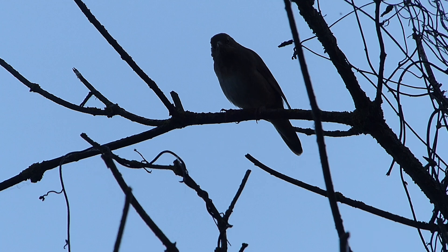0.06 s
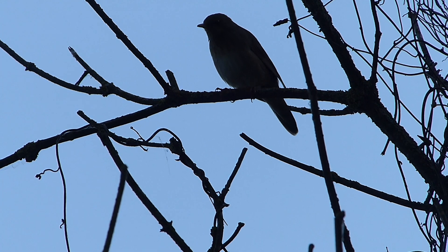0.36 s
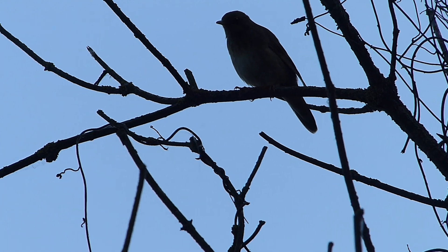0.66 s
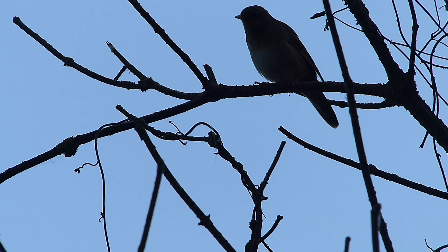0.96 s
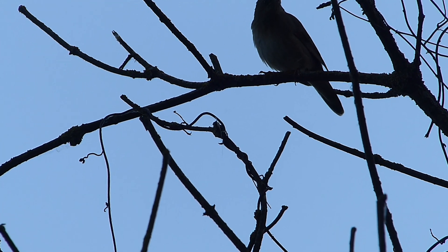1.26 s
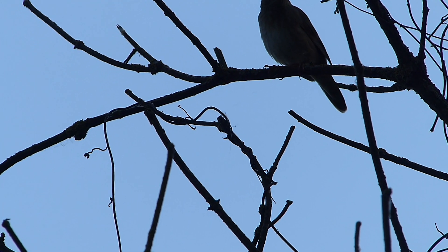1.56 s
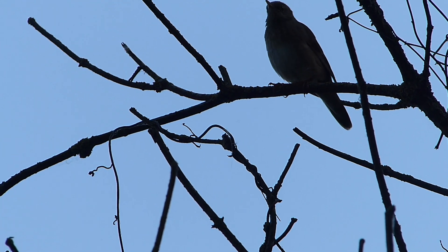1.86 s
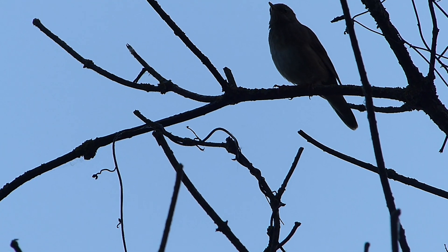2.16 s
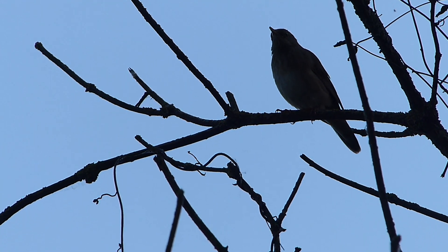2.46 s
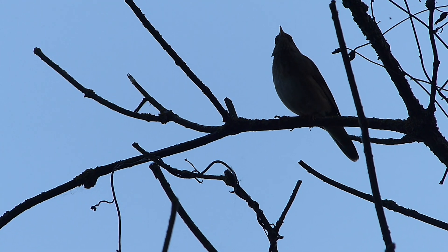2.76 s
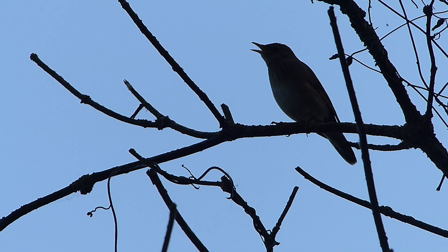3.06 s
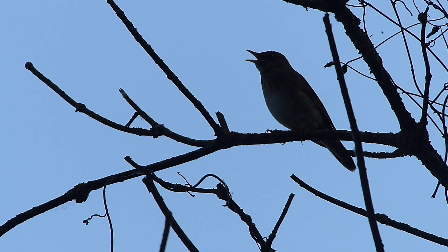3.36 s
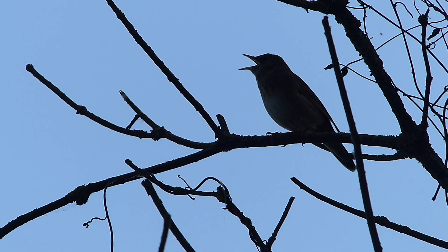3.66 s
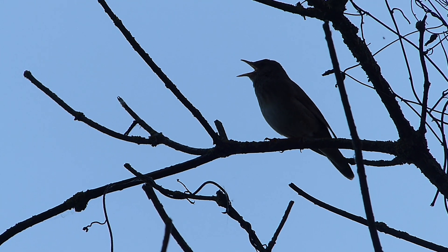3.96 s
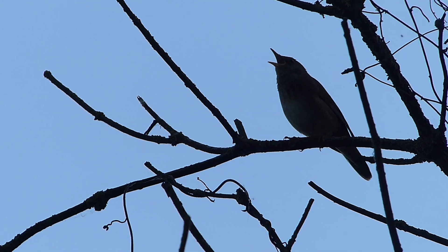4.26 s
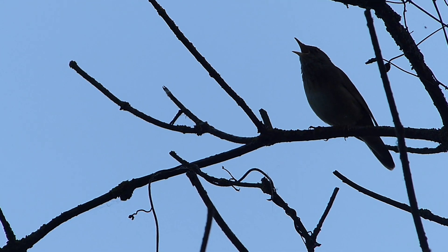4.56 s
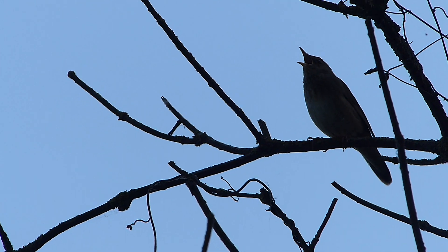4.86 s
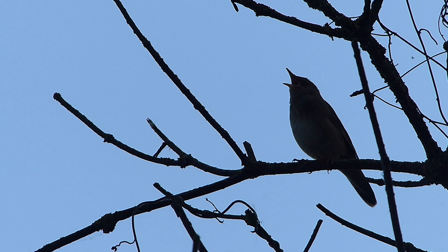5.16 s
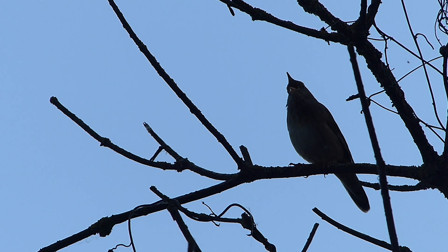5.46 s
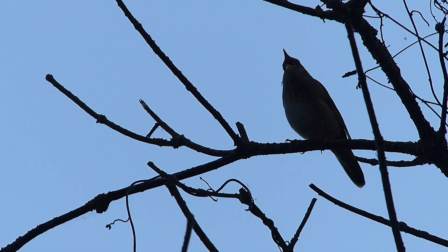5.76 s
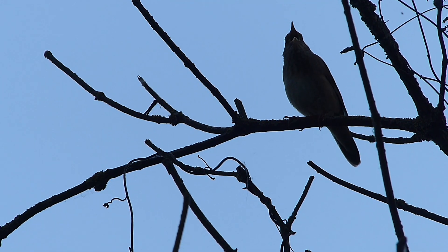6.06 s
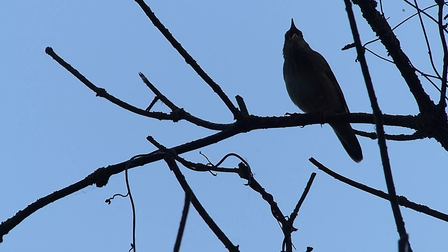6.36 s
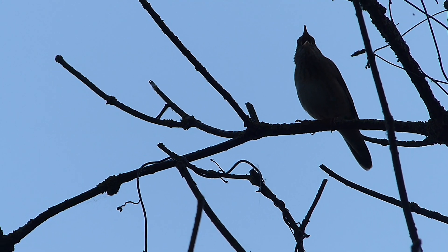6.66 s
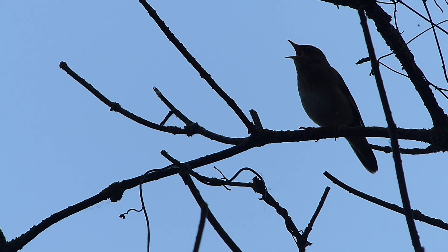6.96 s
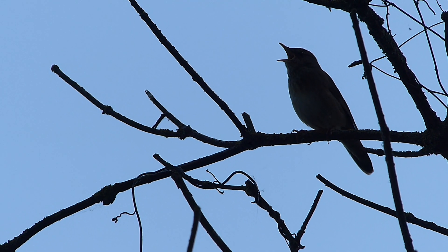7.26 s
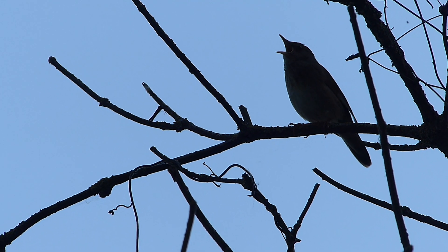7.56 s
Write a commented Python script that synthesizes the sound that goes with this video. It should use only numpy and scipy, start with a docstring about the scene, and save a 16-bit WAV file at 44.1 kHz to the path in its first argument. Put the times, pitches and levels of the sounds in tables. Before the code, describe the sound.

In a thicket, soft air hiss and low gusts rumble on the microphone while a distant bird gives three short runs of dry ticking chatter. A nearby warbler then starts with a few soft, halting notes and swells into a high, fast, buzzing trill like a sewing machine. It keeps going evenly with a light woodland echo, and the sound narrows from wide stereo to near mono as the trill begins.

```python
"""In a thicket, a river warbler warms up and swells into its sewing-machine trill, 16 syllables a second. Each
syllable is a rattle of fast down-sweeps from the syrinx, ending in a whistle; four kinds take turns, and the
wood echoes them. The air hisses over a faint hum, gusts rumble on the microphone, and another bird chatters
before the song. The stereo image closes to near mono as the trill begins."""
import sys
import numpy as np
from scipy import signal
from scipy.fft import rfft, irfft, next_fast_len
from scipy.io import wavfile
from scipy.ndimage import map_coordinates

SR = 44100
rng = np.random.default_rng(int(sys.argv[2]) if len(sys.argv) > 2 else 0)


def dump(signal):
    """Clip the signal to [-1, 1] and save it as 16-bit WAV at the path in sys.argv[1]."""
    limited = np.clip(np.atleast_2d(signal).T, -1, 1)
    pcm = np.round(limited * 32767).astype(np.int16)
    wavfile.write(sys.argv[1], SR, pcm)


N = 335601


def amp(db):
    """Decibels to gain."""
    return 10 ** (np.asarray(db) / 20)


def unit_rms(x):
    """Scale to rms 1."""
    return x / np.sqrt(np.mean(x ** 2) + 1e-20)


def at_freq(rows, hz):
    """Rows of freq_hz, value, read on a log axis."""
    freq_hz, value = np.transpose(rows)
    return np.interp(np.log(hz + 1), np.log(freq_hz + 1), value)


def curve(rows):
    """Rows of time_s, value, read at every sample."""
    return np.interp(np.arange(N) / SR, *np.transpose(rows))


def wobble(rate_hz):
    """Smooth random curve, rate_hz knots a second."""
    knots = rng.standard_normal(int(N * rate_hz / SR) + 4)
    return map_coordinates(knots, [np.arange(N) * rate_hz / SR])


def filtered(x, response):
    """Zero-phase filter with gain response(hz)."""
    size = next_fast_len(N + 8192)
    return irfft(rfft(x, size) * response(np.fft.rfftfreq(size, 1 / SR)), size)[..., :N]


def noise(spectrum):
    """Coloured noise, rms 1."""
    return unit_rms(filtered(rng.standard_normal(N), lambda hz: amp(at_freq(spectrum, hz))))


def band(centre_hz, width_hz):
    """Bell-shaped noise band, rms 1."""
    white = rng.standard_normal(N)
    return unit_rms(filtered(white, lambda hz: np.exp(-((hz - centre_hz) / width_hz) ** 2)))


def add(track, start_s, sound):
    """Mix a sound into the track."""
    span = track[round(start_s * SR):][:len(sound)]
    span += sound[:len(span)]


# Spectra of mid murmur, mid hiss and side air: freq_hz, level_db
MURMUR_SPECTRUM = [(20, -23), (100, -13.5), (250, -10), (450, -3.5), (620, 1), (850, -0.5), (1000, .5),
                   (1200, -3.5), (1700, -6.5), (2400, -11), (4000, -13), (12000, -39)]
HISS_SPECTRUM = [(1500, -25), (3000, -11), (4150, 0), (4450, -2), (4850, 2.5), (7000, 0), (9500, -1),
                 (11500, -7.5), (14000, -19.5), (16000, -28)]
AIR_SIDE_SPECTRUM = [(20, -24), (60, -22), (130, -21), (300, -7), (550, 2), (900, -2), (1300, -8.5),
                     (2400, -16.5), (5000, -12.5), (9500, -10.5), (12000, -18), (16000, -38)]
# Envelopes of murmur, hiss and the hum near 440 Hz: time_s, level_db
MURMUR_LEVEL = [(0.3, -51), (0.89, -50), (1.05, -50.5), (1.21, -52), (7.6, -52.5)]
HISS_LEVEL = [(.25, -45.5), (1.2, -45.5), (2.3, -47), (3.5, -46), (7.6, -43.5)]
HUM_LEVEL = [(.25, -59.5), (1.4, -64), (2.1, -63), (2.6, -55), (3.1, -66), (7.6, -77)]
# Steady side-channel hum: centre_hz, width_hz, level_db
SIDE_HUM = [(440, 38, -59), (662, 34, -49)]


def background(murmur_db, hiss_db, side_db):
    """Murmur of the landscape, fine hiss and a faint recorder hum; returns mid, side."""
    murmur = amp(murmur_db + curve(MURMUR_LEVEL) + 0.75 * wobble(7.2)) * noise(MURMUR_SPECTRUM)
    hiss = amp(hiss_db + curve(HISS_LEVEL)) * noise(HISS_SPECTRUM)
    hum = amp(curve(HUM_LEVEL)) * band(centre_hz=441, width_hz=38)
    side_hum = sum(amp(db) * band(hz, width_hz) for hz, width_hz, db in SIDE_HUM)
    return murmur + hiss + hum, amp(side_db) * noise(AIR_SIDE_SPECTRUM) + side_hum


# Gusts: peak_s, level_db, rise_s, fall_s, bass_db
GUSTS = [(.38, -50.5, 0.1, .1, 5), (1.05, -36, .18, 0.15, 2), (1.71, -42.5, .11, .1, 6.5),
         (1.97, -45, 0.11, 0.093, 5.5), (3.47, -45, 0.34, 0.34, 8), (3.63, -42, .05, 0.044, 7),
         (4.16, -43, .18, 0.15, -1.5), (4.9, -54.5, 0.72, 0.47, 0.5), (5.25, -54, 0.18, 0.23, 0),
         (5.348, -40.5, 0.018, .02, -3), (7.5, -55, 0.27, .3, 1.5)]


def gusts(calm_db):
    """Bell-shaped gusts over a breeze, 10 dB down at rise_s and fall_s; returns strength, bass_db."""
    t = np.arange(N) / SR
    power, weighted_bass = amp(calm_db) ** 2, 0
    for peak_s, level_db, rise_s, fall_s, bass_db in GUSTS:
        from_peak = (t - peak_s) / np.where(t < peak_s, rise_s, fall_s)
        gust_power = amp(level_db - 10 * np.minimum(from_peak ** 2, 20)) ** 2
        power += gust_power
        weighted_bass += bass_db * gust_power
    return np.sqrt(power), weighted_bass / power


# Buffeting spectra, common and opposed: freq_hz, level_db
RUMBLE_MID = [(20, -36), (52, -33), (85, -10), (130, -2), (210, -0.5), (300, -6.5), (430, -13),
              (600, -18.5), (1000, -36), (2000, -55), (4000, -90)]
RUMBLE_SIDE = [(20, -40), (50, -27), (97, -7.5), (213, 1.5), (450, -9), (600, -18), (800, -28), (1570, -48),
               (4000, -67)]


def wind(mid_db, side_db, flutter_db):
    """Gusts push the microphone ports mostly in opposition, more in common in the bass: mid, side."""
    swell, bass_db = gusts(calm_db=-79)
    strength = swell * amp(flutter_db * wobble(28))
    flow = noise(RUMBLE_MID)
    bass = filtered(flow, lambda hz: at_freq([(130, 1), (240, 0.21)], hz))
    tilt = amp(bass_db / 2)  # deep gusts trade upper rumble for bass
    common = bass * tilt + (flow - bass) / tilt
    return strength * amp(mid_db) * common, strength * amp(side_db) * noise(RUMBLE_SIDE)


# Scolding runs: start_s, note_count, first_gap_s, gap_growth_s, level_db
CHATTER_RUNS = [(.7896, 5, 0.038, 0.0043, -37.5), (1.827, 9, .039, .002, -37.5),
                (2.277, 5, .047, .0056, -38.5)]


def chatter(gain_db, first_note_db, rise_s, tick_gap_s, scatter_db):
    """Another bird's noisy double ticks, in runs that start softly and slow down."""
    envelope = np.zeros(N)
    t = np.arange(SR // 20) / SR
    tick = t / rise_s * np.exp(1 - t / rise_s)
    for start_s, note_count, first_gap_s, gap_growth_s, level_db in CHATTER_RUNS:
        for k in range(round(note_count)):
            note_s = start_s + k * first_gap_s + gap_growth_s * k * (k - 1) / 2
            note_db = gain_db + level_db + first_note_db * (k == 0)
            for onset_s in (note_s, note_s + tick_gap_s):
                add(envelope, onset_s, amp(note_db + scatter_db * rng.standard_normal()) * tick)
    return envelope * band(centre_hz=3370, width_hz=980)


# Echo decay: freq_hz, t60_s
THICKET_DECAY = [(2500, 0.69), (6000, 0.46), (14000, 0.21)]


def thicket(x, blocks=16):
    """Diffuse echo of the wood; swaying leaves renew the tail each block, and the echo carries little of the
    highest overtones."""
    freq_hz, t, spectra = signal.stft(rng.standard_normal((blocks, SR // 2)), SR, nperseg=256)
    decay = amp(-60 * t / at_freq(THICKET_DECAY, freq_hz)[:, None])
    _, tails = signal.istft(spectra * decay, SR, nperseg=256)
    echo = np.zeros(N)
    for block, tail in zip(np.array_split(np.arange(N), blocks), tails):
        add(echo, block[0] / SR, signal.fftconvolve(x[block], tail / np.linalg.norm(tail)))
    return filtered(echo, lambda hz: amp(at_freq([(8000, 0), (12000, -7)], hz)))


# Halting first syllables: last_sweep_s, kind, rattle_db, whistle_db
WARMUP = [(2.6372, 2, -34, -34), (2.6969, 3, -31, -29.5), (2.7617, 3, -37, -39), (2.8321, 0, -34, -36),
          (2.893, 2, -26, -31), (2.9589, 3, -21, -35), (3.0191, 0, -23, -26), (3.0863, 1, -19.5, -18),
          (3.1546, 3, -19, -24), (3.2139, 0, -21, -16.5), (3.28, 1, -19, -18), (3.3437, 3, -16.5, -35)]
# Trill phrase, one row per kind: offset_s, rattle_db, whistle_db, whistle_db_per_effort_db
PHRASE = [(0, -10, -6.5, 1.3), (.0631, -9.5, -7.5, 0.84), (.1267, -9, -10.4, 1.16), (.1885, -9, -14, 3.5)]
# Swell of the trill: time_s, effort_db
EFFORT = [(3.4, -6.8), (3.8, -5), (4.09, -3.8), (4.28, -0.9), (4.75, -0.85), (5.5, .5), (6.3, 0.5),
          (7.6, 0.07)]


def syllables(trill_start_s=3.4062, phrase_s=0.24743):
    """Warm-up, then one phrase repeating evenly and swelling with effort; columns as in WARMUP."""
    rows = list(WARMUP)
    for start_s in np.arange(trill_start_s, N / SR + phrase_s, phrase_s):
        for kind, (offset_s, rattle_db, whistle_db, growth) in enumerate(PHRASE):
            last_sweep_s = start_s + offset_s
            effort_db = np.interp(last_sweep_s, *np.transpose(EFFORT))
            rows.append((last_sweep_s, kind, rattle_db + effort_db, whistle_db + growth * effort_db))
    return rows


def glide(time_ms, pitch_hz, gain, octave_db, third_db):
    """Tone with two overtones along a contour; returns start_s, wave."""
    time_s = time_ms / 1000
    t = np.arange(time_s[0], time_s[-1], 1 / SR)
    hz = np.interp(t, time_s, pitch_hz)
    phase = 2 * np.pi * (np.cumsum(hz) / SR + rng.random())
    octave = amp(np.interp(t, time_s, np.full(len(time_s), octave_db))) * np.sin(2 * phase)
    third = amp(third_db) * np.sin(3 * phase) * (3 * hz < SR / 2)
    return time_s[0], np.interp(t, time_s, gain) * (np.sin(phase) + octave + third)


# Base contour of one sweep: time_ms, pitch_hz, gain
SWEEP = [(-1.0, 6980, 0.05), (-0.63, 7050, 0.35), (-0.52, 6670, 0.72), (-0.067, 5965, 1.01),
         (0.3, 5530, 0.72), (0.7, 4950, 0.37), (1.04, 4360, 0.26), (1.69, 5900, 0.06)]
# Sweeps of a rattle, last to first: offset_ms, level_db, depth_ratio, length_ratio
RATTLE = [(0.5, -1, 0.98, 1.0), (-4, -1.8, 1.18, .97), (-8.5, -2, 1.14, .95), (-12.5, -4.5, 1, .95),
          (-16.5, -1.5, 1.1, 0.922), (-20.5, -6, 0.68, 1.15), (-23, -15.5, 1.4, 0.975)]
# Rattle size per kind: sweep_count
SWEEP_COUNT = [6, 6, 7, 7]
# Rasp per kind: strength_ratio
RASP = [0.58, 1.205, 1.06, 0.75]


def rattles(scatter_db, jitter_s, pitch_scatter, rasp_db, pivot_hz=6130):
    """The syrinx opens about 260 times a second, each time sliding steeply down in pitch."""
    track = np.zeros(N)
    time_ms, base_hz, gain = np.transpose(SWEEP)
    for last_sweep_s, kind, rattle_db, _ in syllables():
        kind = round(kind)
        # Early syllables fall further, lean on their low end and start more softly.
        slack = np.interp(last_sweep_s, [2.9, 4.4], [1, 0])
        for k, (offset_ms, sweep_db, depth, length) in enumerate(RATTLE[:SWEEP_COUNT[kind]]):
            louder, later, sharper, longer, harsher = rng.standard_normal(5)
            drawl = 1.7 if (kind, k) == (3, 0) else 1  # long last sweep before the faint whistle
            sweep_ms = time_ms * length * drawl * np.exp(0.1 * longer)
            pitch_hz = (pivot_hz + depth * (base_hz - pivot_hz)) * (1 + pitch_scatter * sharper)
            pitch_hz -= 0.16 * slack * (pitch_hz[0] - pitch_hz)
            envelope = gain * (pitch_hz.mean() / pitch_hz) ** (2.25 * slack)
            # The bottom of the last, hardest sweeps breaks into an octave-rich rasp.
            low_end = np.interp(pitch_hz, [4750, 5300], [1, 0])
            rasp = RASP[kind] * low_end * np.exp(-k / 3.6) * (1 + 0.25 * harsher)
            octave_db = -24.5 + rasp_db * rasp
            lead_s, wave = glide(sweep_ms, pitch_hz, envelope, octave_db, third_db=-27)
            onset_s = last_sweep_s + offset_ms / 1000 + lead_s + jitter_s * later
            level_db = rattle_db + sweep_db * (1 + 0.75 * slack) + scatter_db * louder
            add(track, onset_s, amp(level_db) * wave)
    return track


# Whistle contours, kinds 0-3: after_last_sweep_ms, pitch_hz, gain
WHISTLE_HIGH = [(4.8, 9800, 0), (5.4, 8070, 0.16), (6.6, 7700, 0.41), (7.8, 7090, 0.34), (9, 6830, 0.52),
                (10, 6790, 0.84), (11.1, 6990, 0.96), (12.8, 5900, 0)]
WHISTLE_MIDDLE = [(3.9, 7520, 0.035), (5, 6920, 0.46), (5.9, 6530, 0.83), (7.2, 6280, 0.66),
                  (9, 6090, 0.89), (11, 5800, 0.078), (12.8, 5600, 0)]
WHISTLE_LOW = [(4.0, 6960, 0.088), (5, 6700, 0.025), (5.6, 6220, 0.81), (7.2, 5960, 1), (9, 5960, 0.58),
               (11, 5940, 0.066), (13.5, 5450, 0.28)]
WHISTLE_FAINT = [(7.5, 7300, 0), (9.6, 6890, 0.89), (11, 6840, 0.37), (12.8, 6200, 0)]


def whistles(gain_db, scatter_db, pitch_scatter):
    """A falling note closes each syllable; softer notes are purer."""
    track = np.zeros(N)
    contours = [WHISTLE_HIGH, WHISTLE_MIDDLE, WHISTLE_LOW, WHISTLE_FAINT]
    for last_sweep_s, kind, _, whistle_db in syllables():
        time_ms, base_hz, gain = np.transpose(contours[round(kind)])
        pitch_hz = base_hz * (1 + pitch_scatter * rng.standard_normal())
        lead_s, wave = glide(time_ms, pitch_hz, gain, octave_db=-24.5 + 0.24 * whistle_db, third_db=-50)
        level_db = gain_db + whistle_db + scatter_db * rng.standard_normal()
        add(track, last_sweep_s + lead_s, amp(level_db) * wave)
    return track


# Tone colour of the song at the microphone: freq_hz, gain_db
SONG_COLOUR = [(2500, -13), (3500, -12.5), (4150, 0.5), (4480, -14), (4850, 1), (6000, -1), (6950, 0),
               (7300, -6.5), (7550, -1.5), (8500, 0.5), (9400, 1.5), (10800, -6), (12200, 1.5),
               (13100, -5.5), (14700, 1.5), (16000, -4)]


def song_colour(x):
    """Peaks and notches colour the song as the microphone picks it up."""
    return filtered(x, lambda hz: amp(at_freq(SONG_COLOUR, hz)))


def twigs(x, reflection_db, spread_s, count=10):
    """Direct sound plus weak copies off near branches, shifting as the bird turns its head."""
    reflections = np.zeros(N)
    for delay_s in np.linspace(0.0006, spread_s, count) * rng.uniform(0.85, 1.15, count):
        delayed = np.pad(x, (round(delay_s * SR), 0))[:N]
        reflections += delayed * wobble(3.016) * np.exp(-delay_s / spread_s)
    return x + amp(reflection_db) * reflections


def scene():
    """Birds straight ahead; air, wind and echo around them. Returns left, right."""
    rattle = rattles(scatter_db=1.53, jitter_s=0.00012, pitch_scatter=0.013, rasp_db=16)
    whistle = whistles(gain_db=1, scatter_db=0.4, pitch_scatter=0.0088)
    song = twigs(song_colour(rattle + whistle), reflection_db=-13.5, spread_s=0.005)
    other_bird = chatter(gain_db=-5.5, first_note_db=-4, rise_s=0.0012, tick_gap_s=0.0053, scatter_db=0.6)
    birds = song + amp(-11.5) * thicket(song) + other_bird + amp(-6.5) * thicket(other_bird)
    wind_mid, wind_side = wind(mid_db=0.5, side_db=18, flutter_db=2.5)
    air_mid, air_side = background(murmur_db=2, hiss_db=-0.5, side_db=-50.5)
    mid = birds + wind_mid + air_mid
    side = wind_side + air_side + amp(-17) * thicket(song + other_bird)
    return np.array([mid + side, mid - side])


# Stereo width: time_s, side_gain_db
STEREO_WIDTH = [(3.29, 0), (3.32, -8.5), (3.45, -9), (3.49, -46), (7.6, -45)]


def record(dry):
    """The microphone opens, later narrows to near mono, and passes nothing above its band limit."""
    open_s, limit_hz = 0.236, 15850
    mid = (dry[0] + dry[1]) / 2
    side = (dry[0] - dry[1]) / 2 * amp(curve(STEREO_WIDTH))
    gate = curve([(open_s - 0.002, 0), (open_s + 0.002, 1)])
    return filtered(gate * np.array([mid + side, mid - side]), lambda hz: hz < limit_hz)


dry = scene()
out = record(dry)
dump(out)
```